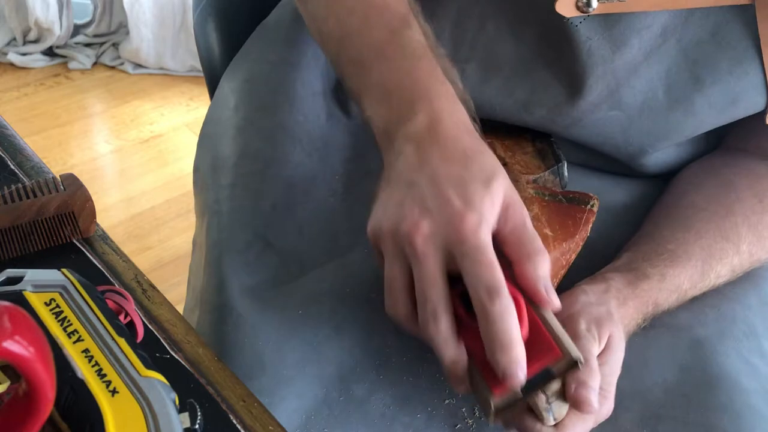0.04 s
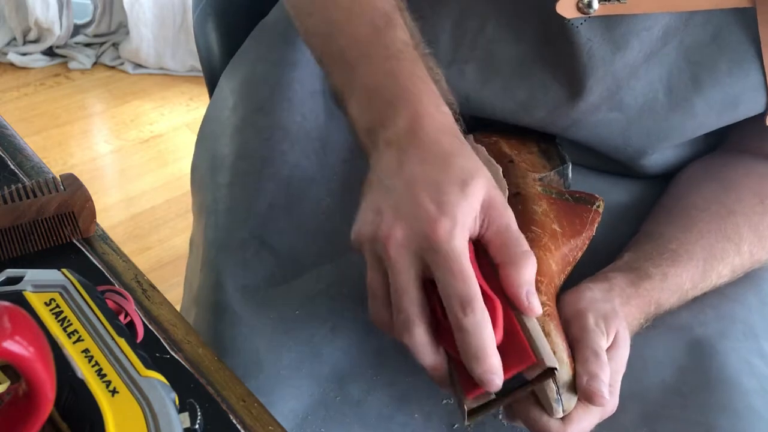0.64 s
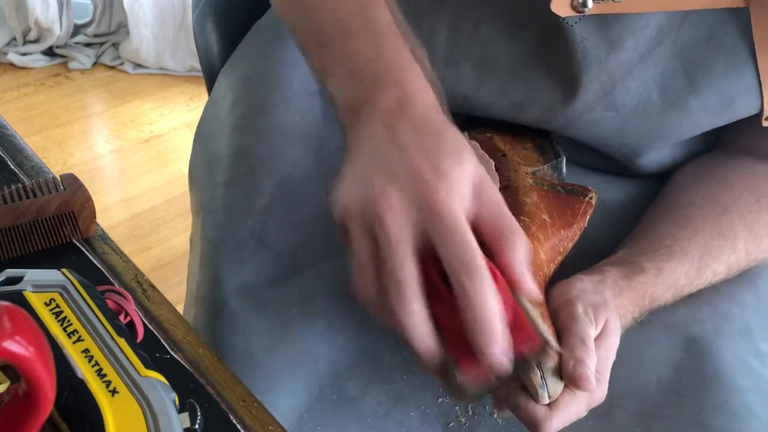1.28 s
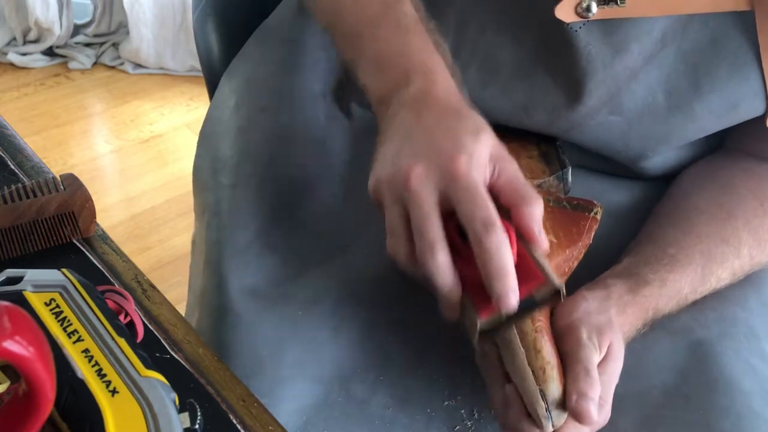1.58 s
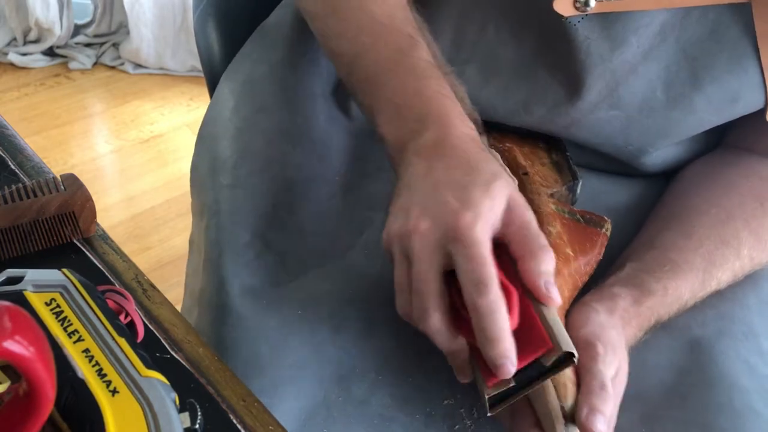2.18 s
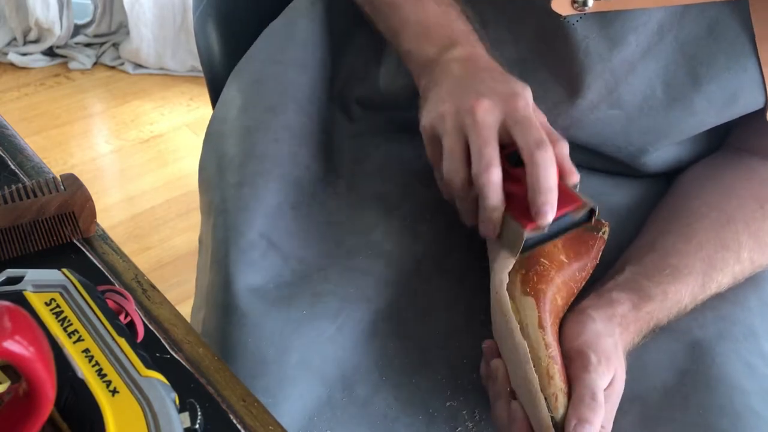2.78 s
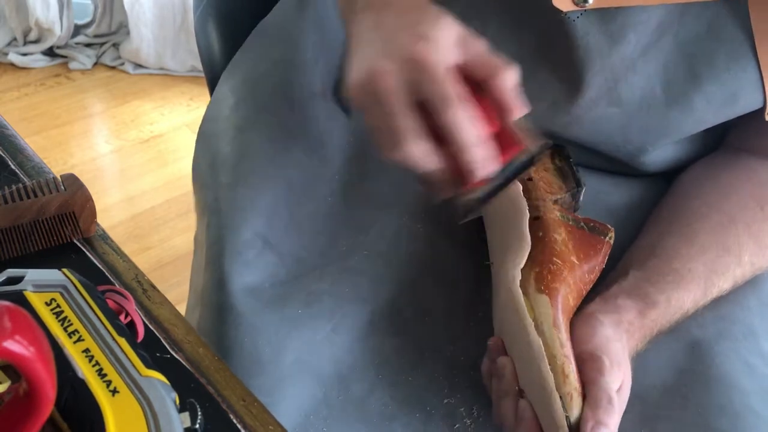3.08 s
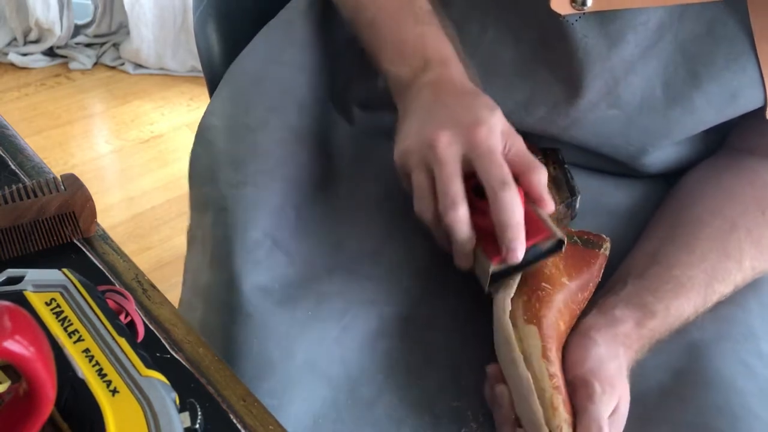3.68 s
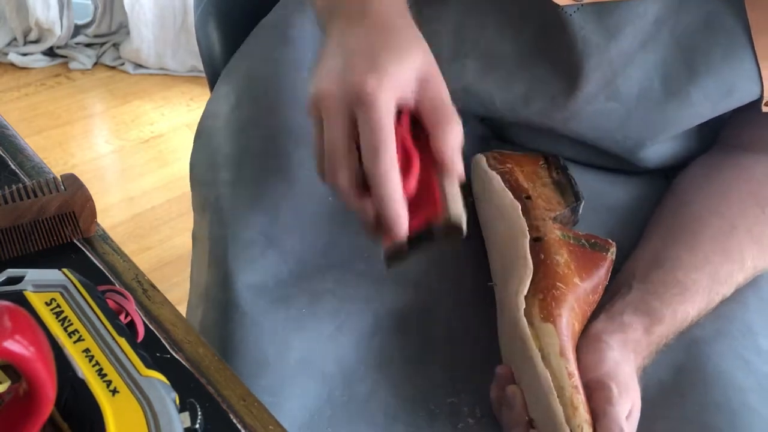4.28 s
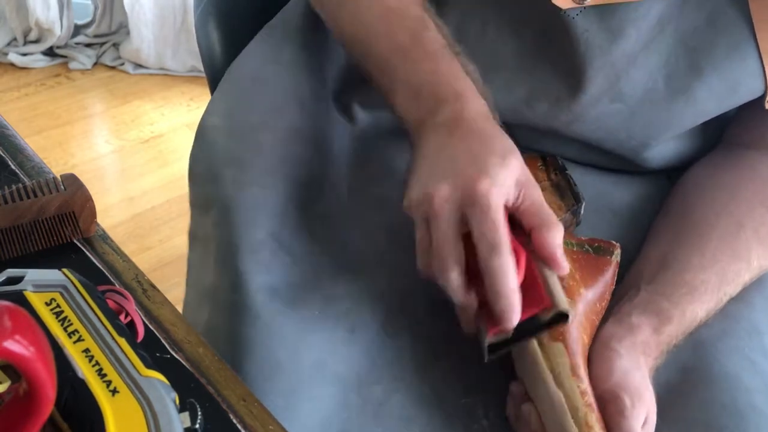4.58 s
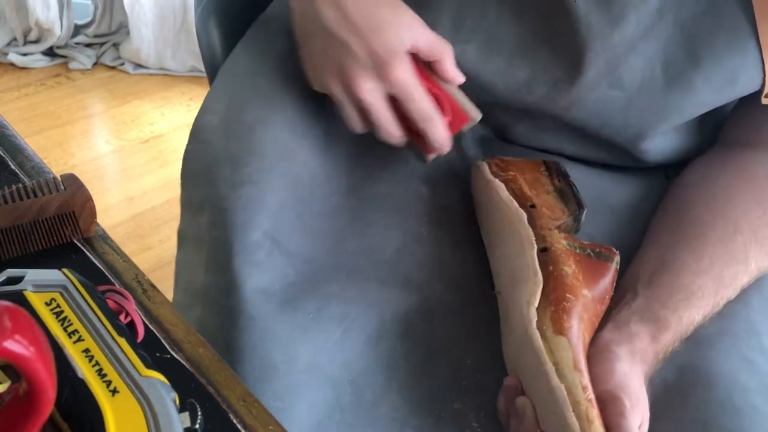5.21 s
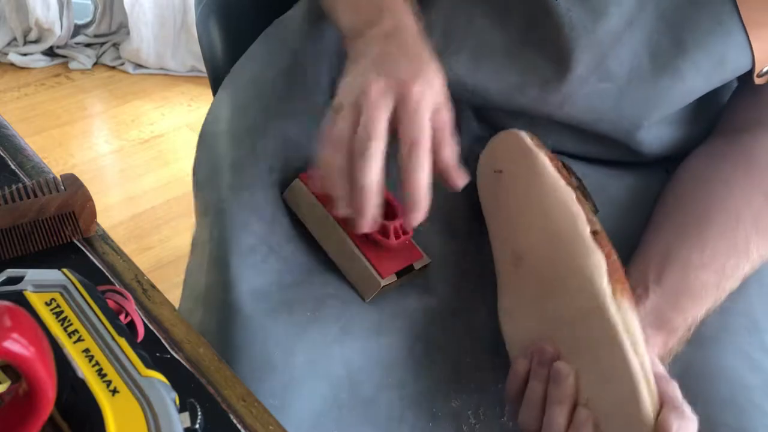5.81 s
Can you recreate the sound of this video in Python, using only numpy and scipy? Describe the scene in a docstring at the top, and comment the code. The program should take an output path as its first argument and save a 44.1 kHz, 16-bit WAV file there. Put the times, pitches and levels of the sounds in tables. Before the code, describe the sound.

Close, gritty scraping of a sanding block on a leather shoe: three short strokes, then three longer ones that end in a hollow, chattering grind. Dull knocks mark the block's return, with soft rubbing and small creaks from the holding hand. The final stroke is the strongest and carries a thin squeal. The block then settles on an apron with a light knock and rustle, over the faint hush of a small room.

```python
"""Sanding a leather shoe.

A hand pushes a sanding block six times along the sole edge of a shoe held on the lap, in a small
workshop. The block lands with a dull clack, its grit rasps over the leather, and towards the heel
the hollow shoe drones. Between strokes the grip creaks; at last the block is set on a rustling apron."""
import sys
import numpy as np
from scipy import signal
from scipy.fft import rfft, irfft, next_fast_len
from scipy.io import wavfile
from scipy.ndimage import uniform_filter1d, map_coordinates

SR = 44100
rng = np.random.default_rng(int(sys.argv[2]) if len(sys.argv) > 2 else 0)


def unload_audio(sound):
    """Save the sound as a 16-bit wav file, at the path given as the first command line argument."""
    columns = np.transpose(np.atleast_2d(sound))
    # keep every value between -1 and 1, then stretch to whole-number steps
    steps = np.round(np.clip(columns, -1, 1) * 32767)
    wavfile.write(sys.argv[1], SR, steps.astype(np.int16))


N = 257984
TIME = np.arange(N) / SR
FFT_SIZE = next_fast_len(N + SR // 2, real=True)
FREQS = np.fft.rfftfreq(FFT_SIZE, 1 / SR)


def undb(db):
    """Decibels to gain."""
    return 10 ** (np.asarray(db) / 20)


def unit(x):
    """Scale to rms 1."""
    return x / np.std(x)


def noise():
    """White noise, rms 1."""
    return rng.standard_normal(N)


def grit(per_s, spread_db):
    """Grains catch and snap free: dense clicks of uneven size, rms 1."""
    caught = rng.random(N) < per_s / SR
    return unit(caught * np.sign(noise()) * undb(spread_db * noise()))


def walk(rate_hz):
    """Ramps between random values, spread near 1."""
    steps = rng.standard_normal(2000)
    return 1.2 * np.interp(TIME * rate_hz, np.arange(len(steps)), steps)


def filtered(x, response):
    """Apply a frequency response."""
    return irfft(rfft(x, FFT_SIZE) * response, FFT_SIZE)[:N]


def band(x, lo_hz, hi_hz, order):
    """Causal band-pass."""
    sos = signal.butter(order, [lo_hz, min(hi_hz, .45 * SR)], "band", fs=SR, output="sos")
    return signal.sosfilt(sos, x)


def colour(x, points, size=4096):
    """Minimum-phase filter through (f/Hz, level/dB) points."""
    hz, db = np.transpose(points)
    grid = np.fft.rfftfreq(size, 1 / SR)
    gain = undb(np.interp(np.log(grid + 1), np.log(hz), db))
    cepstrum = irfft(np.log(gain))
    cepstrum[1:] *= 2
    response = np.exp(rfft(cepstrum[:size // 2], size))
    return filtered(x, np.interp(FREQS, grid, response))


def resonate(x, modes, size=16384):
    """Drive damped (f/Hz, width/Hz, level/dB) modes; neighbours swing in opposite senses."""
    f = np.fft.rfftfreq(size, 1 / SR)
    response = sum((-1) ** k * undb(db) * 1j * f * width / (hz ** 2 - f ** 2 + 1j * f * width)
                   for k, (hz, width, db) in enumerate(modes))
    return filtered(x, np.interp(FREQS, f, response))


def envelope(start_s, length_s, attack_s, release_s):
    """Linear rise, hold, exponential decay."""
    age = TIME - start_s
    return np.clip(age / attack_s, 0, 1) * np.exp(-np.maximum(age - length_s, 0) / release_s)


def bell(t, half_s):
    """Gaussian bump at time t."""
    return np.exp(-((TIME - t) / half_s) ** 2)


def swells(rows):
    """Gain rising from silence at each (t/s, half length/s, level/dB)."""
    return sum(undb(db) * bell(t, half_s) for t, half_s, db in rows)


def accents(rows, column=2):
    """Gain of 1, shifted around each (t/s, half length/s) by the dB in one column."""
    return undb(sum(row[column] * bell(row[0], row[1]) for row in rows))


def bursts(source, rows, ring_s):
    """A decaying burst per (t/s, level/dB, rise/s); level is its energy as rms over 10 ms."""
    out, age = np.zeros(N + SR), TIME[:SR // 10]
    for t, db, rise_s in rows:
        start = int(t * SR)
        span = slice(start, start + len(age))
        shape = np.minimum(age / rise_s, 1) * np.exp(-np.maximum(age - rise_s, 0) / ring_s)
        burst = shape * source[span]
        out[span] += undb(db) * burst * np.sqrt(SR / 100 / np.sum(burst ** 2))
    return out[:N]


def wander(x, spread_db, width_hz, hold_s):
    """The contact patch keeps changing, so narrow resonances come and go."""
    hz, t, cells = signal.stft(x, SR, nperseg=512)
    grid = np.meshgrid(hz / width_hz, t / hold_s, indexing="ij")
    patches = map_coordinates(rng.standard_normal((256, 512)), grid, order=1, mode="mirror")
    return signal.istft(cells * undb(spread_db * patches), SR, nperseg=512)[1][:N]


def steady(x):
    """Friction keeps feeding a ring: rms held near 1 over 25 ms."""
    return x / np.sqrt(uniform_filter1d(x ** 2, SR // 40) + 1e-18)


# strokes: t/s, length/s, release/s, level/dB, hiss/dB rel, pad/dB rel, sole/dB rel, holding hand/dB
STROKES = [(-0.09, 0.45, 0.042, -56, -5.5, -2, -10, -56.5),
           (0.66, 0.46, 0.018, -57, -4, -1.5, -10.5, -58.5),
           (1.409, 0.43, 0.055, -50.5, -4.5, -3, -8.5, -56),
           (2.209, 0.84, 0.0084, -58.5, -6.5, -2.5, -6.5, -59.5),
           (3.398, 0.745, 0.035, -57, -6.5, -6.5, -2.5, -60.5),
           (4.526, 0.68, 0.008, -57.5, -6.5, -3.5, -1.5, -64)]
# pushes and slackenings: t/s, half length/s, speed change/dB, pad ring change/dB
PUSHES = [(0.17, 0.034, 3, 4.5), (0.315, 0.087, 5, 5.5), (1.055, 0.076, 4, 2), (1.76, 0.056, 2.5, 4),
          (2.85, 0.064, 7, -3.5), (3.03, 0.049, 3, 4), (3.93, 0.068, -4.5, -1), (4.12, 0.057, 5.5, 5.5),
          (4.795, 0.032, 5.5, 0), (4.89, 0.024, 7.5, -2), (4.97, 0.04, -2.5, 0), (5.11, 0.068, 8, -3),
          (5.183, 0.034, 15.5, -4)]
# grit on leather: f/Hz, level/dB
RASP_SPECTRUM = [(120, -18), (300, -15), (500, -10.5), (730, 1.5), (1000, -2.5), (1600, 6), (2300, 0.5),
                 (3100, 2), (3900, 0), (4500, -2.5), (6000, -5), (8500, -8), (12000, -13), (16000, -21)]
# block pad and sole resonances: f/Hz, width/Hz, level/dB
PAD_MODES = [(1890, 430, -1), (2190, 1260, -2)]
SOLE_MODES = [(910, 140, -14.5), (1187, 185, -4.5)]
CONTACT_ATTACK_S = 0.0088


def sanding():
    """Grit tears over the leather and rings pad and sole; faster travel adds fine hiss."""
    start_speed, accelerate_s, brake_s, lean_db_per_s = 0.12, 0.094, 0.088, 6  # full speed = 1
    rasp = colour(grit(per_s=4000, spread_db=-2), RASP_SPECTRUM)
    lows = filtered(rasp, 1 / (1 + (FREQS / 6500) ** 6))
    coarse, hiss = unit(lows), unit(rasp - lows)
    pad = resonate(grit(per_s=4000, spread_db=0.5), PAD_MODES)
    pad = accents(PUSHES, column=3) * unit(band(pad, 1000, 4100, order=1))
    sole = unit(band(resonate(noise(), SOLE_MODES), 490, 1530, order=2))
    scrape, push = 0, accents(PUSHES)
    for t, length_s, release_s, level_db, hiss_db, pad_db, sole_db, _ in STROKES:
        age = np.clip(TIME - t, 0, length_s)
        contact = envelope(t, length_s, CONTACT_ATTACK_S, release_s)
        run_up = 1 - (1 - start_speed) * np.exp(-(age / accelerate_s) ** 2)
        braking = np.exp(-np.maximum(TIME - t - length_s, 0) / brake_s)
        speed = push * run_up * braking
        ring = undb(pad_db) * pad + undb(sole_db) * sole
        stroke = speed ** 0.69 * ring + speed * coarse + speed ** 1.22 * undb(hiss_db) * hiss
        scrape += contact * undb(level_db + lean_db_per_s * age) * stroke
    flicker = undb(walk(rate_hz=90) + 1.42 * walk(rate_hz=22))
    return flicker * wander(scrape, spread_db=3.5, width_hz=187.7, hold_s=0.06)


# harder shakes of the shoe: t/s, half length/s, level/dB
SHUDDERS = [(0.07, 0.091, -61), (0.8, 0.04, -58.5), (1.65, 0.1, -57.5), (3.04, 0.039, -58),
            (3.63, 0.046, -68), (4.155, 0.021, -56.5), (5.125, 0.022, -60), (5.21, 0.057, -60.5)]


def shudder():
    """The drag shakes the whole shoe, faintly through each stroke and harder at times."""
    contact = sum(envelope(t, length_s, CONTACT_ATTACK_S, release_s)
                  for t, length_s, release_s, *_ in STROKES)
    rumble = unit(band(noise(), 64, 162, order=2))
    return (undb(-76.5) * contact + swells(SHUDDERS)) * rumble


# fingers take a new hold: t/s, half length/s, level/dB
REGRIPS = [(0.52, 0.03, -72), (1.32, 0.062, -65), (1.99, 0.053, -68.5), (2.15, 0.078, -59.5),
           (4.43, 0.12, -67.5), (5.28, 0.1, -57)]
# skin on leather: f/Hz, level/dB
GRIP_SPECTRUM = [(60, -22.5), (130, -5.5), (300, -1.5), (520, 5), (750, 0), (1150, 2.5), (1700, -5.5),
                 (3000, -8), (5000, -18), (15000, -31)]


def grip(rest_db=-72):
    """The holding hand rubs the leather in small catches, tightening against each stroke."""
    strain = sum(undb(db) * envelope(t, length_s, attack_s=0.0067, release_s=0.043)
                 for t, length_s, *_, db in STROKES)
    rub = unit(colour(grit(per_s=1200, spread_db=1), GRIP_SPECTRUM))
    flicker = undb(1.97 * walk(rate_hz=71))
    return (undb(rest_db) + strain + swells(REGRIPS)) * flicker * rub


# room hush: f/Hz, level/dB
AIR_SPECTRUM = [(15, -37), (25, -15.5), (114, 0.5), (317, -8.5), (405, -5.5), (1440, -24), (1890, -19.5),
                (9570, -25), (16000, -35)]


def air(level_db=-68):
    """Steady hush of the workshop."""
    return undb(level_db) * unit(colour(noise(), AIR_SPECTRUM))


# single leather slips: t/s, tick/dB, bump/dB
CREAKS = [(0.476, -78, -59), (0.502, -78, -71), (0.532, -90.5, -63.5), (.583, -71, -60), (0.588, -61, -73),
          (0.609, -58.5, -66), (0.624, -63, -63), (0.74, -56, -54.5), (1.17, -56, -62), (1.205, -64, -59),
          (1.229, -60.5, -59), (1.252, -91, -58.5), (1.87, -50, -44.5), (1.898, -48, -51),
          (2.083, -63, -53), (2.115, -60.5, -51.5), (2.133, -74, -64), (2.264, -65, -69), (3.111, -54, -54),
          (4.386, -65.5, -67), (5.601, -60.5, -60)]
# runs of slips: t/s, length/s, gap/s, first tick/dB, growth/(dB/s)
SLIP_RUNS = [(1.293, 0.07, 0.0092, -70.5, 120), (3.302, 0.026, 0.008, -60.5, -160)]


def creaks(tick_rise_s=0.0005, bump_rise_s=0.002):
    """Leather slips under the fingers with a tick; single slips also bump the hollow shoe."""
    ticks = [(t, db, tick_rise_s) for t, db, _ in CREAKS]
    for t, length_s, gap_s, db, db_per_s in SLIP_RUNS:
        ticks += [(t + age, db + db_per_s * age, tick_rise_s) for age in np.arange(0, length_s, gap_s)]
    bumps = [(t, db, bump_rise_s) for t, _, db in CREAKS]
    tick = bursts(band(noise(), 740, 3300, order=2), ticks, ring_s=0.002)
    bump = bursts(band(noise(), 400, 674, order=2), bumps, ring_s=0.011)
    return tick + bump


# block hits or catches on the shoe, last on the lap: t/s, clack/dB, crunch/dB, thud/dB, seating/s
LANDINGS = [(0.6389, -34, -44.5, -37, 0.0024), (1.364, -38, -45, -41, 0.0042),
            (2.2052, -45.5, -72, -57, 0.00058), (2.2122, -45.5, -58, -48.5, 0.0032),
            (2.2775, -36, -51.5, -74, 0.0031), (3.386, -35.5, -45, -40, 0.0045),
            (4.121, -46, -42.5, -49, 0.0076), (4.5147, -36, -42, -38.5, 0.0044),
            (5.191, -55, -36.5, -46, 0.00099), (5.6751, -42.5, -51, -48, 0.0025)]
# block and shoe resonances: f/Hz, width/Hz, level/dB
BLOCK_MODES = [(1230, 500, 4.5), (1620, 760, 5.5), (2270, 316, 11), (2900, 43, 8.5), (3300, 440, -2),
               (4400, 350, -14), (6940, 50, -3), (9760, 610, -23)]
SHOE_MODES = [(110, 12, -6.5), (187, 33, 3), (310, 480, -4.5), (505, 105, 0), (669, 40, 3.5),
              (1080, 760, -5.5)]


def landings():
    """The grit crunches, the block clacks as it seats, then the soft shoe gives with a thud."""
    t, clack_db, crunch_db, thud_db, seat_s = np.transpose(LANDINGS)
    crunch = bursts(band(noise(), 3960, 6300, order=1), zip(t, crunch_db, seat_s), ring_s=0.0037)
    clack = bursts(resonate(noise(), BLOCK_MODES), zip(t, clack_db, seat_s), ring_s=0.0025)
    thud = bursts(resonate(noise(), SHOE_MODES), zip(t + seat_s, thud_db, seat_s), ring_s=0.0087)
    return crunch + clack + thud


# passes over the heel: t/s, length/s, cavity/dB, cavity swell/dB, stack/dB, stack swell/dB
HEEL_PASSES = [(2.915, 0.096, -51.5, 1.5, -59, 11), (3.92, 0.19, -50, 10.5, -54, 10),
               (5.003, 0.195, -44, 9, -52, 13.5)]
# block grinds off the rim: t/s, half length/s, stack boost/dB
RIM_GRIND = [(5.178, 0.029, 11)]
# shoe cavity and heel stack resonances: f/Hz, width/Hz, level/dB
CAVITY_MODES = [(295, 210, -4), (401, 104, 2.5), (522, 95, 16.5)]
STACK_MODES = [(744, 230, -2.5), (932, 88, 10), (1097, 38, -11), (1567, 210, -10), (2540, 110, -6),
               (2870, 88, -6), (3840, 400, -8), (4380, 110, -12), (5030, 120, -9.5), (5470, 170, -16),
               (6800, 120, -9), (8000, 960, -32)]


def heel_drone():
    """The chattering block rings the shoe's hollow and the stiff heel stack, louder towards the rim."""
    cavity = resonate(grit(per_s=1200, spread_db=4.5), CAVITY_MODES)
    cavity = steady(band(cavity, 210, 630, order=2))
    stack = resonate(grit(per_s=2800, spread_db=0), STACK_MODES)
    stack = accents(RIM_GRIND) * steady(band(stack, 580, 12000, order=2))
    drone = 0
    for t, length_s, cavity_db, cavity_swell_db, stack_db, stack_swell_db in HEEL_PASSES:
        travel = np.clip((TIME - t) / length_s, 0, 1)
        ring = undb(cavity_db + cavity_swell_db * travel) * cavity
        ring += undb(stack_db + stack_swell_db * travel) * stack
        drone += envelope(t, length_s, attack_s=0.0068, release_s=0.011) * ring
    stick_slip = undb(1.8 * walk(rate_hz=110))
    return stick_slip * drone


# heel squeal: t/s, half length/s, level/dB
SQUEAL = [(5.1, 0.05, -50)]
# its resonance: f/Hz, width/Hz, level/dB
SQUEAL_MODE = [(5650, 110, 0)]


def squeal():
    """Grit squeals thinly on the heel in one narrow resonance."""
    return swells(SQUEAL) * steady(resonate(noise(), SQUEAL_MODE))


# apron touches: t/s, length/s, release/s, level/dB
APRON_TOUCHES = [(5.597, 0.079, 0.01, -58), (5.667, 0.0084, 0.01, -42), (5.677, 0.02, 0.09, -52.5)]
# apron rustle: f/Hz, level/dB
APRON_SPECTRUM = [(30, -36), (65, -4), (120, 2), (200, 0.5), (400, -7), (800, -9), (1500, -7.5),
                  (2500, -16), (6000, -23), (15000, -39)]


def apron():
    """The apron rustles as the hand brushes it and the block settles on it."""
    contact = sum(undb(db) * envelope(t, length_s, attack_s=0.0071, release_s=release_s)
                  for t, length_s, release_s, db in APRON_TOUCHES)
    return contact * unit(colour(grit(per_s=3700, spread_db=4.5), APRON_SPECTRUM))


# workshop reverberation: f/Hz, T60/s
ROOM_T60 = [(150, 0.078), (900, 0.47), (4000, 0.41), (12000, 0.27)]


def room(x, wet_db, first_s):
    """Diffuse reflections from floor and walls, by octave; the mids ring longest."""
    hz, t60 = np.transpose(ROOM_T60)
    age, white, tail = TIME[:SR], rng.standard_normal(SR), 0
    for lo_hz in 88 * 2 ** np.arange(8):
        t60_s = np.interp(np.log(lo_hz * np.sqrt(2)), np.log(hz), t60)
        tail += band(white, lo_hz, 2 * lo_hz, order=2) * undb(-60 * age / t60_s)
    tail *= np.clip(age / first_s - 1, 0, 1)
    return undb(wet_db) * signal.fftconvolve(x, tail / np.linalg.norm(tail))[:N]


def scene():
    """Handwork in a quiet room, the same in both channels."""
    friction = sanding() + shudder() + grip() + apron()
    knocks = creaks() + landings()
    heel = heel_drone() + squeal()
    send = friction + undb(-3.5) * knocks + undb(-1) * heel  # hand covers the block, lap damps the heel
    mono = friction + knocks + heel + room(send, wet_db=-11.5, first_s=0.0029) + air()
    return np.array([mono, mono])


def record(dry, top_hz=15900):
    """Steep low-pass."""
    return signal.sosfilt(signal.ellip(10, .1, 70, top_hz, fs=SR, output="sos"), dry)


dry = scene()
out = record(dry)
unload_audio(out)
```